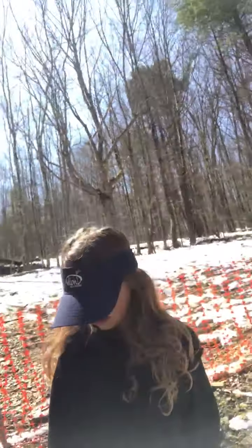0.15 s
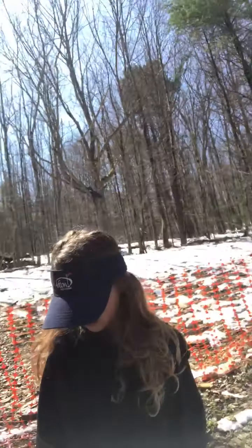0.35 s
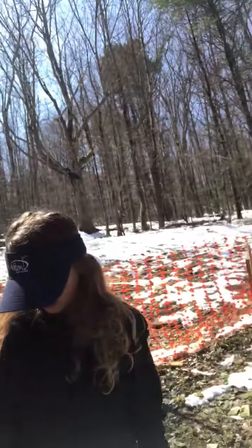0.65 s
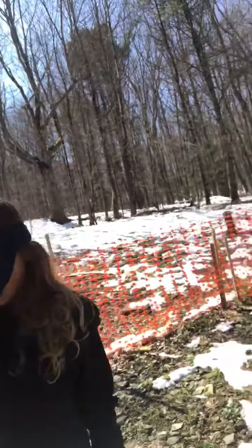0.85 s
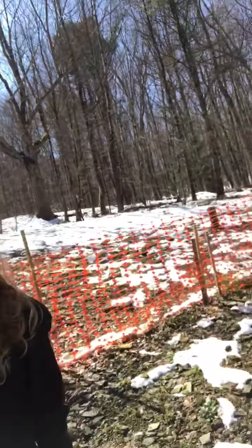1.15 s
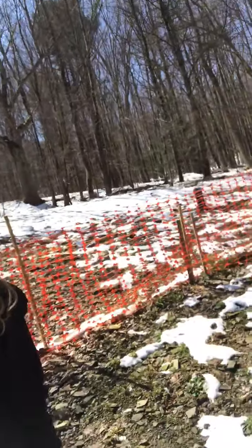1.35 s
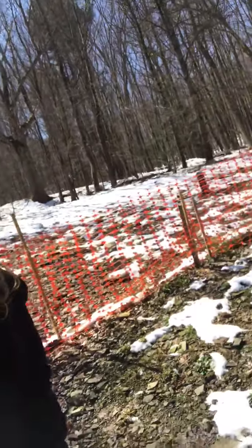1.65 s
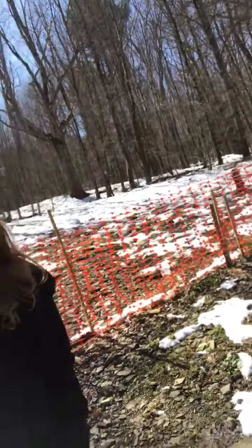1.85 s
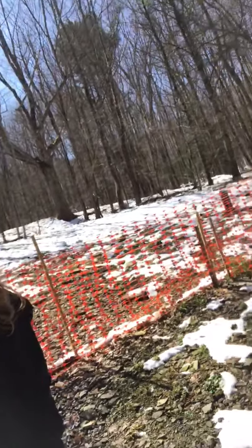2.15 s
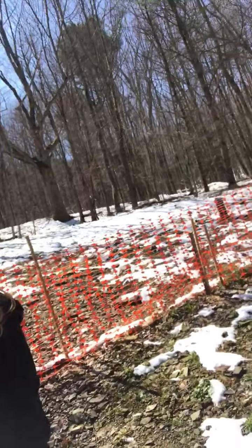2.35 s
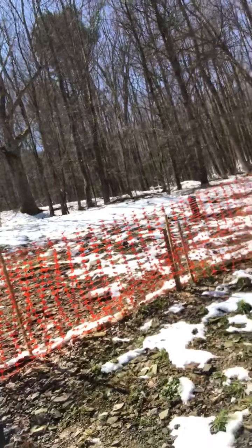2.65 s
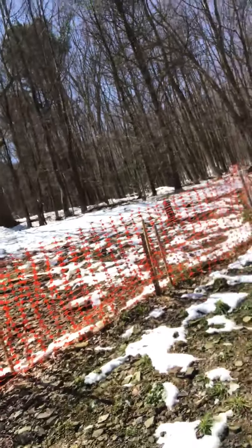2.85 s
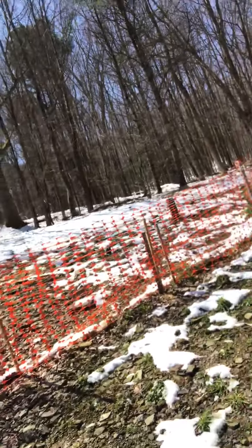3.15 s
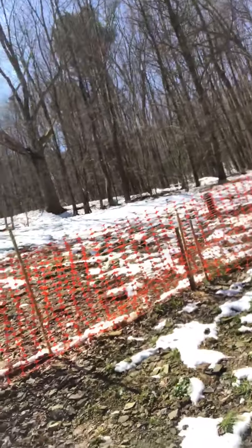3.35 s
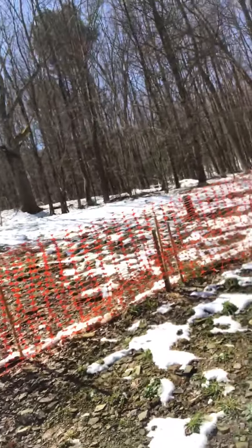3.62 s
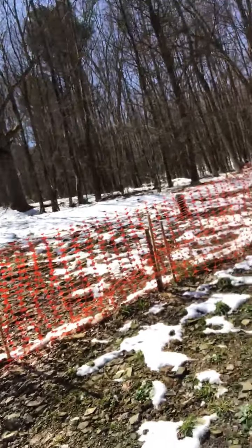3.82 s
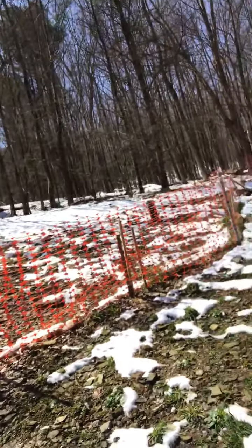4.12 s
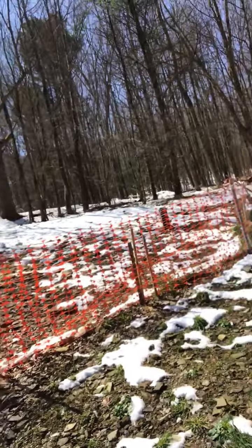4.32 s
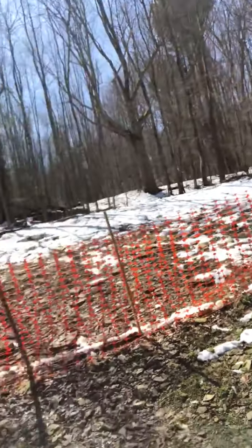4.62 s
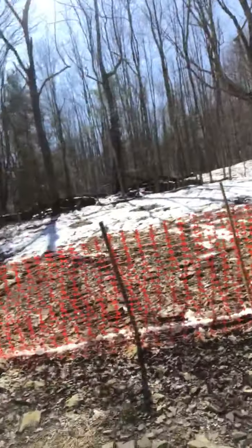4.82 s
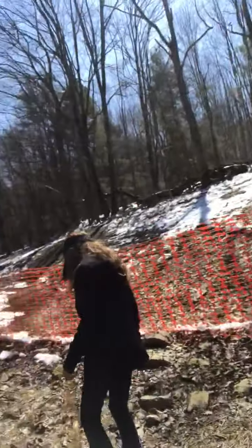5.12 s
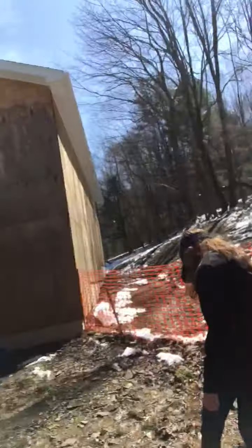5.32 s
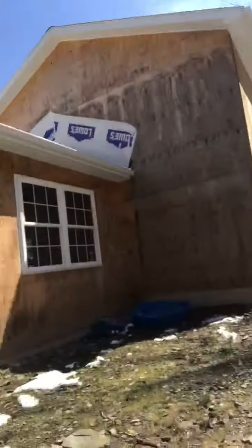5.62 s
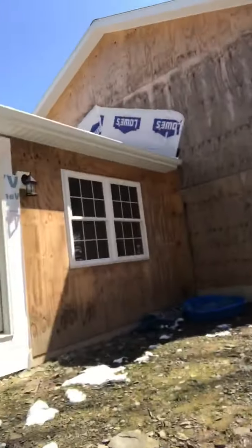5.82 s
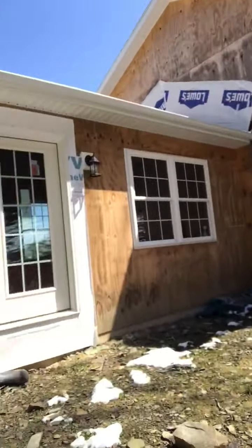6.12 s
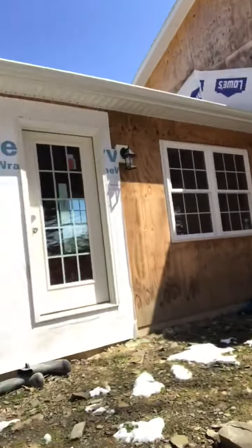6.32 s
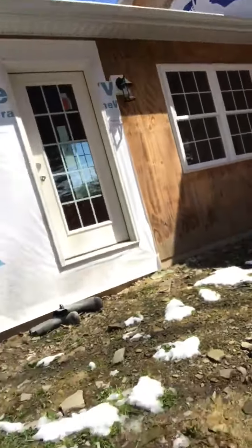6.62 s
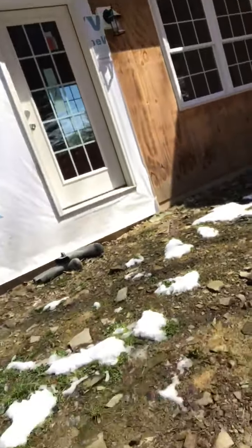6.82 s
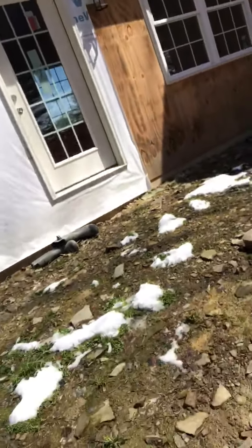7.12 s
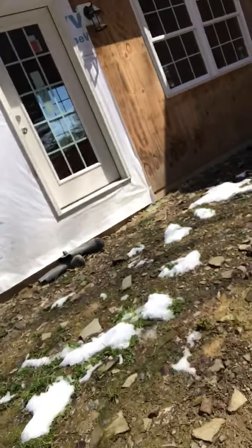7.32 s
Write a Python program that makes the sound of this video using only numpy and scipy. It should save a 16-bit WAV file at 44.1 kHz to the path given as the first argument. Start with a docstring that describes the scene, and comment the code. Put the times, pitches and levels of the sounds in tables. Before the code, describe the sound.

Boots squelch and crunch over wet mud, slush and loose stones outdoors, with sharp stone cracks, wet pops, soft thumps and low wind puffs.

```python
"""A muddy yard: boots move over wet mud, slush and loose stones, heard by a hand-held phone.
Soles grind as shaped grain noise, stones crack as banded noise bursts, heels thud at a falling pitch.
Mud pops and meltwater gurgles as damped sines; two thin whistles glide once.
Wind buffets as lumpy bass noise with single puffs, over a faint hum and hiss.
Near the end the scene jumps to a quieter corner."""
import sys
import numpy as np
from scipy import signal
from scipy.fft import rfft, irfft, next_fast_len
from scipy.io import wavfile
from scipy.ndimage import map_coordinates

SR = 44100
rng = np.random.default_rng(int(sys.argv[2]) if len(sys.argv) > 2 else 0)


def pcm_store(signal):
    """Save signal as 16-bit PCM."""
    levels = np.round(np.clip(np.atleast_2d(signal), -1, 1) * 32767)
    wavfile.write(sys.argv[1], SR, levels.astype(np.int16).T)


N = 329427
JUMP_S = 6.676  # where the quieter corner begins


def amp(db):
    """Decibels to gain."""
    return 10 ** (np.asarray(db) / 20)


def unit(x):
    """Scaled to rms 1."""
    return x / np.sqrt(np.mean(x ** 2) + 1e-20)


def curves(rows):
    """One value per sample for each column after the time."""
    s, *cols = np.transpose(rows)
    return [np.interp(np.arange(N) / SR, s, c) for c in cols]


def wobble(rate_hz):
    """A smooth random curve, rate_hz knots a second."""
    knots = rng.standard_normal(int(N * rate_hz / SR) + 4)
    return map_coordinates(knots, [np.arange(N) * rate_hz / SR])


def coloured(x, spectrum):
    """x filtered by (f/Hz, level/dB) points on a log frequency axis, rms 1."""
    m = next_fast_len(N + 8192)
    hz, db = np.transpose(spectrum)
    log_hz = np.log(np.fft.rfftfreq(m, 1 / SR) + 1)
    gain = amp(np.interp(log_hz, np.log(hz + 1), db))
    return unit(irfft(rfft(x, m) * gain, m)[:N])


def place(times_s, sounds):
    """Short sounds, one a row, summed at their times."""
    starts = np.round(np.asarray(times_s) * SR).astype(int)
    at = starts[:, None] + np.arange(sounds.shape[1])
    return np.bincount(at.ravel(), sounds.ravel(), N + sounds.shape[1])[:N]


def blips(peaks_s, db, hz, cycles, rise, length_s, sharp=1):
    """Damped gliding sines that swell for sharp * cycles, then die; small sharp starts abruptly."""
    hz = np.asarray(hz)[:, None]
    turns = hz * np.arange(round(length_s * SR)) / SR
    life = turns / cycles
    shape = (life / sharp) ** sharp * np.exp(sharp - life)
    glide = 1 + rise * np.minimum(life, 4)
    starts_s = (peaks_s - sharp * (cycles / hz)[:, 0]).clip(0)
    return place(starts_s, amp(db)[:, None] * shape * np.sin(2 * np.pi * turns * glide))


def scuffs():
    """Soles grind grit and squeeze slush; single grains tick and droplets burst on top of the rub."""
    # Spectra, relative: f/Hz, level/dB
    grit_spectrum = [(1470, -51), (2500, -5.5), (4340, -1), (5330, -5.5), (6530, 0.5), (11000, -12.5),
                     (14300, -40), (22000, -120)]
    slurp_spectrum = [(290, -21), (500, -6), (2450, -8), (2740, -10.5), (3500, -18.5), (4550, -18),
                      (7700, -120)]
    hiss_spectrum = [(7000, -120), (9500, -12.0), (11000, -8.0), (15000, -4.5), (17000, -12.0)]
    grit_gain, hiss_gain, slurp_gain = pressure()

    sand = grains(rate_hz=400, spread_db=4.5, t60_s=0.022, smooth=0.5)
    ticks = patter(count=4500, centre_hz=6520, spread=0.28, spread_db=7.5, cycles=0.56, life_s=0.00025)
    grit = coloured(sand, grit_spectrum) + amp(-2.5) * ticks

    fine_ticks = patter(count=900, centre_hz=11430, spread=0.17, spread_db=9.5, cycles=0.4, life_s=0.00005)
    hiss = coloured(sand * amp(3.8 * wobble(30)), hiss_spectrum) + amp(-3.0) * fine_ticks

    slush = coloured(grains(rate_hz=130, spread_db=6.0, t60_s=0.1, smooth=1.25), slurp_spectrum)
    drops = patter(count=2200, centre_hz=1374, spread=0.519, spread_db=6.0, cycles=0.6, life_s=0.0011)
    ringing_drops = patter(count=700, centre_hz=2074, spread=0.322, spread_db=6, cycles=2, life_s=0.0015)
    slurp = slush + amp(-2.5) * drops + amp(-6) * ringing_drops

    gritty = grit_gain * amp(2.7 * wobble(34)) * grit
    wet = slurp_gain * amp(1.46 * wobble(25)) * slurp
    return gritty + hiss_gain * hiss + wet


def pressure():
    """Gains of grit, hiss and slurp: strokes swell fast and fade over a resting shuffle, split at the jump."""
    # Sole strokes: t/s at the peak, length/s, grit level/dB, hiss level/dB, slurp level/dB
    strokes = [(0.01, 0.038, -57, -62, -58.5), (0.105, 0.17, -83, -75, -59), (0.722, 0.33, -71, -77, -64.5),
               (1.03, 0.55, -70.5, -69.5, -66), (1.27, 0.09, -72, -77, -77), (1.42, 0.47, -93, -67, -70),
               (1.834, 0.17, -70, -69, -68), (1.922, 0.19, -73, -84, -75), (2.035, 0.065, -49, -76, -40.5),
               (2.168, 0.13, -64, -68, -61.5), (2.406, 0.23, -58.5, -75, -67.5),
               (2.622, 0.076, -59, -70, -67), (2.698, 0.45, -66, -72, -61), (2.926, 0.83, -69.5, -67, -89),
               (3.335, 0.2, -66, -74, -56.5), (3.416, 0.084, -54, -84, -56.5),
               (3.631, 0.14, -56.5, -73, -63.5), (3.743, 0.072, -48, -73, -53),
               (3.994, 0.23, -66, -70, -65.5), (4.065, 0.092, -56, -58.5, -52),
               (4.337, 0.058, -60.5, -76, -56.5), (4.626, 0.22, -63, -68, -61.5),
               (5.019, 0.18, -57.5, -83, -60.5), (5.163, 0.21, -62, -68, -66),
               (5.421, 0.052, -61, -59, -52.5), (5.566, 0.22, -57.5, -66, -62.5),
               (5.774, 0.12, -53, -61, -55.5), (5.867, 0.13, -60.5, -72, -68),
               (6.375, 0.065, -49.5, -57, -61), (6.576, 0.43, -67.5, -75.5, -61.5),
               (6.844, 0.93, -81, -98, -66)]
    rise_share, fade_db = 0.48, 28.5  # swell time over length; dB lost over one length
    yard_rest_db, corner_rest_db = (-75.5, -82, -72.5), (-86, -99, -100)  # grit, hiss, slurp
    t = np.arange(N) / SR
    power = amp(np.where(t < JUMP_S, np.c_[list(yard_rest_db)], np.c_[list(corner_rest_db)])) ** 2
    for s, length_s, *db in strokes:
        lost_db = fade_db * np.maximum((t - s) / length_s, (s - t) / (rise_share * length_s))
        near = (lost_db < 50) & ((t < JUMP_S) == (s < JUMP_S))
        power[:, near] += amp(np.c_[db] - lost_db[near]) ** 2
    return np.sqrt(power)


def grains(rate_hz, spread_db, t60_s, smooth):
    """Tiny noise bursts of uneven size over a smooth rub."""
    sizes = amp(spread_db * rng.exponential(1, N).clip(0, 4))
    hits = (rng.random(N) < rate_hz / SR) * sizes
    envelope = signal.fftconvolve(hits, amp(-60 * np.arange(512) / SR / t60_s))[:N]
    return rng.standard_normal(N) * (smooth + unit(envelope))


def patter(count, centre_hz, spread, spread_db, cycles, life_s):
    """Random short blips, pitches scattered round a centre, rms 1."""
    s, draw = rng.uniform(0, N / SR, count), rng.standard_normal((count, 2))
    hz = (centre_hz * np.exp(spread * draw[:, 0])).clip(300, 15000)
    db = spread_db * draw[:, 1].clip(-3, 2)
    return unit(blips(s, db, hz, cycles + life_s * hz[:, None], rise=0.017, length_s=0.016, sharp=0.47))


def cracks():
    """Each stone or crust break is a noise burst that builds for an instant, snaps and leaves debris."""
    # Breaks: t/s at the peak, peak level/dB, knock over it/dB, sparkle over it/dB, t60/s before limits
    breaks = [(0.078, -60, 11, -1, 0.0056), (0.113, -55, 17, -8, 0.005), (0.678, -37, -4, -13, 0.0014),
              (0.6921, -21.5, -10.5, -5.5, 0.026), (0.8208, -41, -3, -4, 0.0079),
              (0.8393, -45, -35, -3, 0.016), (0.9766, -42, -11, -9, 0.0048), (1.24, -49, -17, -10, 0.004),
              (1.335, -58, -15, 14.5, 0.005), (1.419, -63, 3, 13, 0.0064), (1.444, -53.5, -11, 15.5, 0.005),
              (1.916, -48.5, -17, 9, 0.005), (1.98, -43, -1, -14, 0.025), (2.022, -28, -3, -10, 0.015),
              (2.027, -28.5, 1, -10, 0.02), (2.037, -27, 3, -7, 0.016), (2.048, -43.5, 13, -13, 0.011),
              (2.185, -43.5, -13, -13, 0.024), (2.567, -31.5, -15, -10, 0.0045),
              (2.577, -30.5, -14, 8.5, 0.0097), (2.606, -37, -9, -8, 0.0081), (2.6354, -45, -9, -17, 0.015),
              (2.6928, -35, -14, -24, 0.0021), (2.713, -25, -21, -36, 0.0059),
              (2.792, -47, 2, 14.5, 0.0052), (3.259, -44, -28, -8, 0.0029), (3.3385, -32, -5, -35, 0.0096),
              (3.3471, -28, -4, -1.5, 0.0045), (3.397, -42, -2, -15, 0.0087),
              (3.423, -32.5, -15, -29, 0.01), (3.43, -35.5, -15, -22, 0.0037), (3.7152, -32, -13, 1, 0.01),
              (3.75, -31, -4, -5, 0.0093), (3.7565, -29.5, -5.5, -1, 0.027), (3.766, -40, -21, -6, 0.0084),
              (3.7908, -33.5, -7, -10, 0.0055), (3.82, -45, -2, -11, 0.055), (4.0553, -38.5, -2, -24, 0.05),
              (4.296, -40, -5, -0.5, 0.0075), (4.593, -43.5, -6.5, -24, 0.019), (4.693, -56, 1, 14, 0.0058),
              (5.068, -42.5, -7, -10, 0.021), (5.153, -55, -12, 8, 0.01), (5.417, -46, -2, 6, 0.008),
              (5.428, -38.5, 2.5, 8.5, 0.0095), (5.7718, -28.5, -13, -40, 0.012),
              (5.871, -46, -13, 9, 0.002), (5.933, -47, 5.5, -14, 0.0059), (5.964, -51, -18, -9, 0.008),
              (6.021, -52, -14, -15, 0.006), (6.097, -45, -2, -2, 0.0089), (6.351, -22.5, -15, -4, 0.0054),
              (6.3527, -14.5, -21, -5, 0.0018), (6.3542, -24, -12.5, 3, 0.046),
              (6.362, -29.5, -10, 3, 0.011), (6.4893, -41.5, 7, -2, 0.0057), (6.551, -45.5, 2.5, 1, 0.0035),
              (6.579, -44.5, -3, -5, 0.0069)]
    s, db, knock_db, sparkle_db, t60_s = np.transpose(breaks)[:, :, None]
    lead_s = 0.004  # build-up
    t = np.arange(round(0.07 * SR)) / SR - lead_s
    build = amp(60 * t / 0.005)
    snap_decay = amp(-60 * t / t60_s.clip(0.002, 0.06))
    debris = amp(-16.0 - 60 * t / 0.058)
    burst = np.where(t < 0, build, snap_decay + debris)
    snap = 6.2 * (t == t[t >= 0][:1])  # one-sample impulse
    noise = rng.standard_normal((len(breaks), len(t))) * burst + snap
    total = 0
    for lo_hz, hi_hz, level_db in [(480, 4100, db + knock_db), (4790, 9120, db),
                                   (8350, 14600, db + sparkle_db)]:
        sos = signal.butter(3, [lo_hz, hi_hz], "bandpass", fs=SR, output="sos")
        band = signal.sosfilt(sos, noise)
        total = total + amp(level_db) * band / np.abs(band).max(axis=1, keepdims=True)
    return place(s[:, 0] - lead_s, total)


def footfalls():
    """A heel slaps soft ground: the pitch drops from a bright contact into a dull thud."""
    # Footfalls and squashed clods: t/s at the start, nominal peak level/dB, final f/Hz
    heels = [(1.419, -44, 229), (3.398, -46.5, 220), (3.42, -45, 282), (3.431, -43, 224),
             (3.442, -41.5, 167), (4.016, -43.5, 210), (4.029, -50, 304), (4.038, -43, 227),
             (4.056, -43, 339), (4.621, -46, 198), (4.6306, -42.5, 216), (5.404, -50, 325),
             (5.415, -44.5, 267), (5.4234, -44, 350)]
    drop, drop_s, decay_s = 5.5, 0.0014, 0.0048  # drop: extra starting pitch over the final pitch
    s, db, hz = np.transpose(heels)[:, :, None]
    t = np.arange(round(0.05 * SR)) / SR
    turns = hz * (t + drop * drop_s * (1 - np.exp(-t / drop_s)))
    shape = np.sqrt(2 * t / decay_s) * np.exp(0.5 - t / decay_s)
    thuds = place(s[:, 0], amp(db) * shape * np.sin(2 * np.pi * turns))
    return thuds * (1 + 0.2 * wobble(900))


def mud():
    """Air pockets and droplets burst abruptly; bubbles swell softly and fade, all as damped sines."""
    # Bursting pockets and droplets: t/s at the peak, nominal peak level/dB, nominal f/Hz
    pop_rows = [(0.079, -40.5, 1210), (0.115, -40.5, 1410), (0.447, -49, 3620), (0.556, -57, 3750),
                (0.578, -44.5, 1310), (0.695, -36.5, 980), (0.992, -47, 5760), (1.811, -46.5, 1220),
                (1.982, -35, 1090), (2.025, -28, 1450), (2.0283, -29.5, 5800), (2.038, -25, 5570),
                (2.04, -25.5, 2700), (2.187, -48, 2000), (2.251, -49.5, 2130), (2.305, -50, 1960),
                (2.308, -54, 2850), (2.477, -51, 2850), (2.606, -42, 1480), (2.635, -46, 1600),
                (2.635, -44, 3120), (2.666, -44, 1630), (2.686, -42.5, 1300), (2.693, -41, 1570),
                (2.713, -30, 3980), (2.774, -47, 1070), (3.347, -27.5, 1186), (3.346, -31.5, 1820),
                (3.364, -45, 1180), (3.419, -52, 1990), (3.44, -46.5, 3500), (3.734, -40, 1440),
                (3.742, -42, 1380), (3.762, -41, 1480), (3.831, -50, 7200), (4.064, -40.5, 1870),
                (4.332, -47.5, 2050), (4.333, -39.5, 4120), (4.345, -44.5, 4340), (4.455, -53, 6000),
                (4.505, -50, 6500), (4.506, -51, 3300), (4.562, -48.5, 7500), (4.611, -48, 1200),
                (4.649, -46, 1210), (4.999, -50, 6500), (5.031, -53, 7850), (5.322, -55, 8000),
                (5.425, -40.5, 2140), (5.443, -48, 3500), (6.353, -40, 1820), (6.14, -55, 5460),
                (6.393, -51, 1620), (6.476, -38.5, 4220), (6.49, -45, 2940), (6.492, -40.5, 820),
                (6.619, -49, 1100), (6.725, -52.5, 1150), (6.79, -56, 1730), (6.815, -54, 2280),
                (6.834, -49.5, 694), (6.85, -52, 1280), (6.888, -43.5, 800), (6.928, -47.5, 1590),
                (6.969, -41, 470), (6.975, -53, 1440), (6.979, -49, 425), (7.004, -56, 2130),
                (7.184, -53.5, 920)]
    # Soft bubbles: t/s at the peak, nominal peak level/dB, nominal f/Hz
    bubble_rows = [(0.349, -49.5, 3190), (0.574, -53.5, 2070), (1.228, -49, 3130), (1.268, -55, 4060),
                   (2.066, -42, 1170), (2.322, -48.5, 1240), (2.555, -57, 2770), (2.704, -49.5, 1245),
                   (3.783, -50, 1860), (3.845, -54, 2050), (4.601, -47, 1230), (5.154, -54, 2220),
                   (6.95, -50, 1010), (7.028, -54, 980), (7.056, -46.5, 1000)]
    s, db, hz = np.transpose(pop_rows)
    pops = wet_rings(s, db, hz, cycles=1.04 + 0.00091 * hz[:, None], rise=0.0085, sharp=0.45)
    s, db, hz = np.transpose(bubble_rows)
    return pops + wet_rings(s, db, hz, cycles=0.0018 * hz[:, None], rise=0.0054, sharp=3.1)


def wet_rings(s, db, hz, cycles, rise, sharp):
    """Big low pockets ring nearly clean; small high ones splutter into a smear round their pitch."""
    low, high = (blips(s[k], db[k], hz[k], cycles[k], rise, 0.047, sharp)
                 for k in (hz < 2400, hz >= 2400))
    return low * (1 + 0.3 * wobble(800)) / 1.3 + high * (0.6 + 0.6 * wobble(1600))


def whistles():
    """Two thin sine whistles glide once: one rises then dips, a fainter one falls."""
    # Pitch tracks: t/s, f/Hz, nominal rms level/dB
    rising = [(4.32, 215, -68), (4.42, 350.7, -65), (4.5, 408, -64), (4.54, 428, -73), (4.59, 385, -59)]
    falling = [(4.49, 1200, -73), (4.56, 930, -70), (4.63, 670, -70)]
    return whistle(rising) + whistle(falling)


def whistle(rows):
    """An unsteady tone that glides and fades at both ends."""
    pitch_hz, level_db = curves(rows)
    t = np.arange(N) / SR
    fade = np.clip(np.minimum(t - rows[0][0], rows[-1][0] - t) / 0.0086, 0, 1)
    flutter = amp(2.5 * wobble(60))
    tone = np.sqrt(2) * np.sin(2 * np.pi * np.cumsum(pitch_hz) / SR)
    return fade * amp(level_db) * flutter * tone


def trickle():
    """Meltwater gurgles until the jump: a dense murmur of small bubbles in a narrow range of pitch."""
    count = 800
    draw = rng.standard_normal((count, 2))
    s = rng.uniform(0, JUMP_S - 0.04, count)
    db = -70.5 + 3 * draw[:, 0].clip(-2, 2)
    hz = 1200 * np.exp(0.18 * draw[:, 1])
    bubbles = blips(s, db, hz, cycles=8.5, rise=0.0046, length_s=0.068)
    return bubbles * amp(4.7 * wobble(9))


def wind():
    """A lumpy buffet, with single puffs that ring the microphone's bass cut at a falling pitch."""
    # Buffet level: t/s, level/dB
    buffet_level = [(0, -66), (1.05, -61.5), (1.9, -62.5), (2.3, -49.5), (2.65, -58), (3, -57),
                    (3.25, -41.5), (3.7, -60.5), (4.3, -63), (4.45, -55.5), (4.7, -63), (5.7, -58),
                    (5.85, -51), (6.5, -51), (6.8, -58), (7.2, -65), (7.47, -54)]
    # Buffet spectrum, relative: f/Hz, level/dB
    buffet_spectrum = [(15, -28), (25, -4.5), (59, 10.5), (87, -2), (138, -23), (250, -16.5), (320, -63),
                       (550, -120)]
    # Puffs: t/s at the peak, peak level/dB, mean f/Hz
    puff_rows = [(2.297, -50, 53), (2.363, -28.5, 67.4), (2.419, -45, 68.6), (3.079, -42.5, 52.7),
                 (3.132, -41.5, 45.6), (3.168, -31.5, 66.5), (3.243, -28.5, 71), (3.442, -37.5, 62),
                 (3.519, -43, 51.5), (4.444, -47.5, 54), (5.789, -38, 61), (5.84, -36, 75.5),
                 (5.907, -31, 81), (5.943, -33.5, 57), (6.012, -46, 93), (6.137, -52, 54),
                 (6.201, -41.5, 67), (6.27, -40.5, 61), (6.42, -33.5, 56.5), (6.445, -36, 77),
                 (6.478, -39.5, 68.4), (7.145, -39, 61.5), (7.31, -46, 90.5), (7.401, -52, 70)]
    start_ratio = 1.54  # first pitch over mean pitch
    lumps = amp(3.8 * wobble(16)) * coloured(rng.standard_normal(N), buffet_spectrum)
    buffet = amp(curves(buffet_level)[0]) * unit(lumps)
    s, db, hz = np.transpose(puff_rows)
    return buffet + blips(s, db, start_ratio * hz, cycles=0.862, rise=-0.098, length_s=0.12)


def air():
    """Distant hum and hiss of the yard as shaped noise, duller and softer in the corner."""
    # Spectra, relative: f/Hz, level/dB
    yard_spectrum = [(35, -42), (60, -17.5), (83, 1.5), (139, -2), (492, -18.5), (1280, -18), (1740, -30),
                     (4220, -29.5), (4970, -31), (6430, -35.5), (10500, -32.5), (14900, -35.5),
                     (16000, -39)]
    corner_spectrum = [(88, -21), (150, 1), (217, -4), (960, -15), (6770, -36.5), (16000, -41.5)]
    yard = amp(-60.5) * coloured(rng.standard_normal(N), yard_spectrum)
    corner = amp(-66.0) * coloured(rng.standard_normal(N), corner_spectrum)
    return np.where(np.arange(N) < JUMP_S * SR, yard, corner)


def scene():
    """Everything reaches one microphone."""
    ground = scuffs() + cracks() + footfalls() + mud()
    return (ground + whistles() + trickle() + wind() + air())[None]


def record(dry):
    """The phone's port dips at two frequencies; treble rolls off steeply and stops at 16.6 kHz."""
    rolloff_hz, stop_hz = 15700, 16600
    m = next_fast_len(N + 8192)
    hz = np.fft.rfftfreq(m, 1 / SR)
    dips_db = -4 * np.exp(-((hz - 4850) / 300) ** 2) - 3 * np.exp(-((hz - 10400) / 450) ** 2)
    rolloff_db = -np.clip(hz - rolloff_hz, 0, None) / 30
    gain = np.where(hz < stop_hz, amp(rolloff_db), 0)
    return irfft(rfft(dry, m) * amp(dips_db) * gain, m)[:, :N]


dry = scene()
out = record(dry)
pcm_store(out)
```